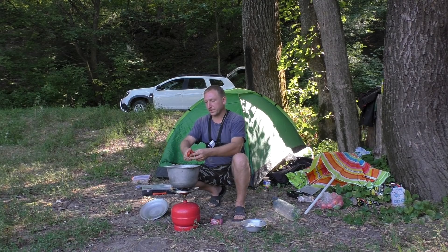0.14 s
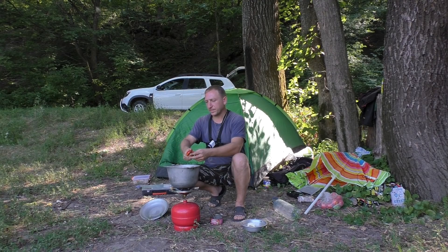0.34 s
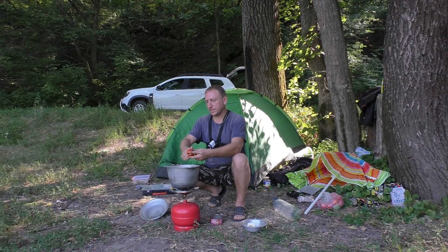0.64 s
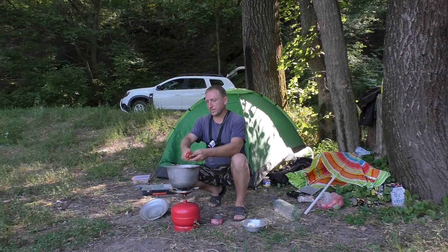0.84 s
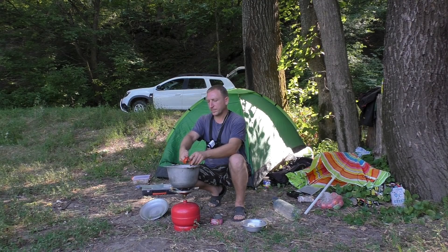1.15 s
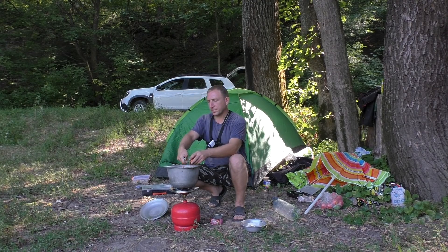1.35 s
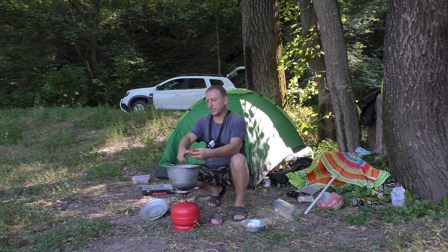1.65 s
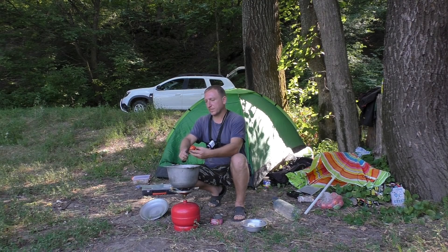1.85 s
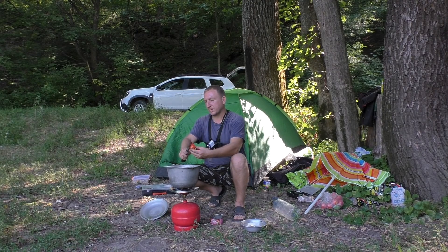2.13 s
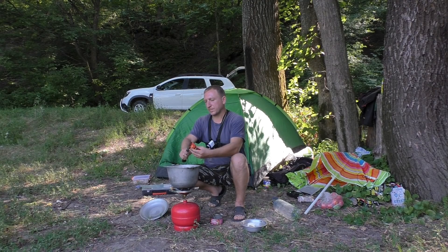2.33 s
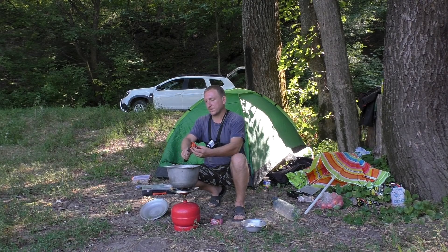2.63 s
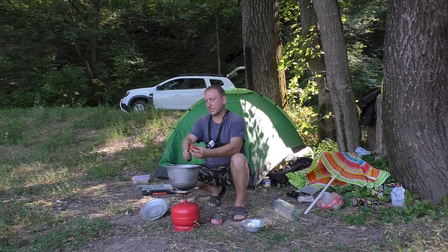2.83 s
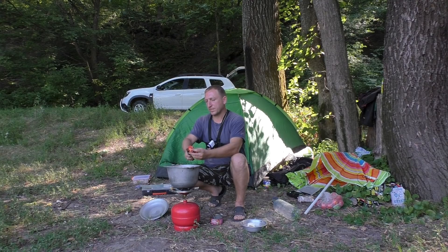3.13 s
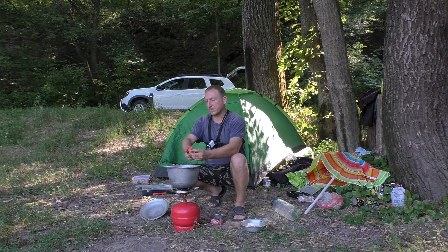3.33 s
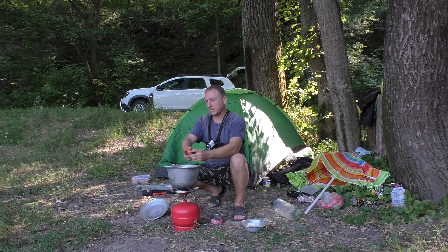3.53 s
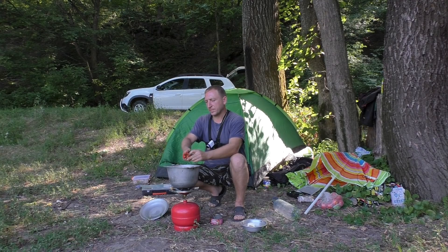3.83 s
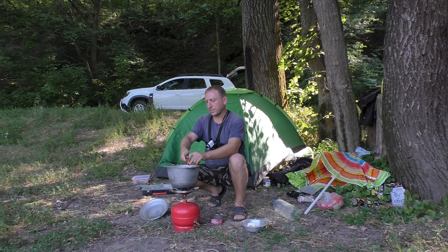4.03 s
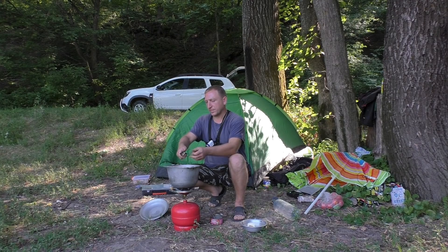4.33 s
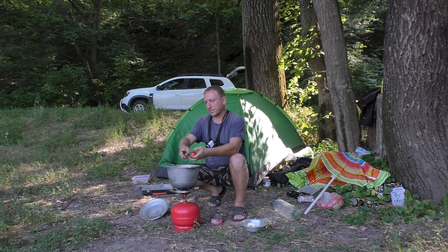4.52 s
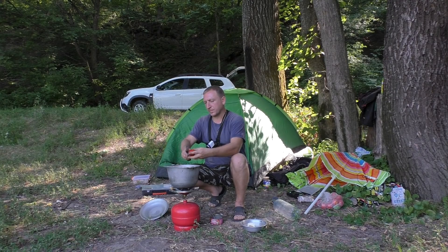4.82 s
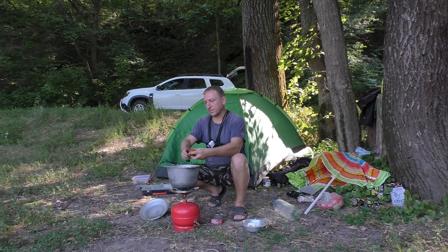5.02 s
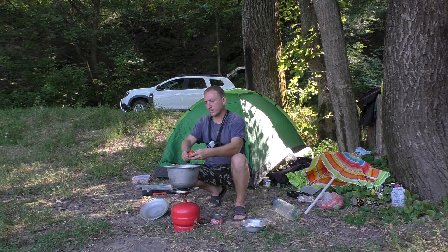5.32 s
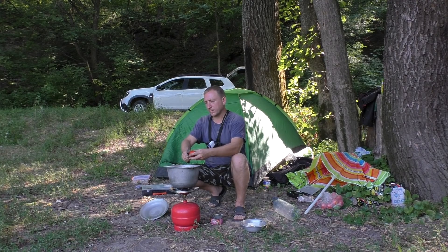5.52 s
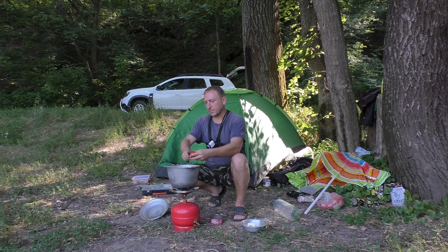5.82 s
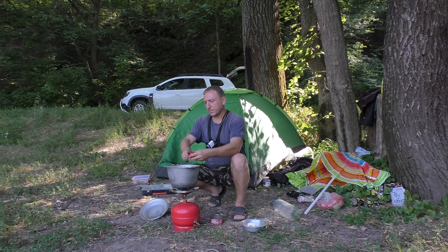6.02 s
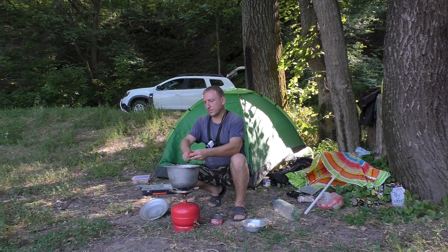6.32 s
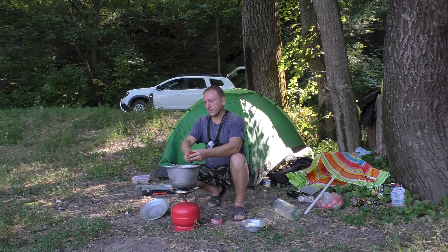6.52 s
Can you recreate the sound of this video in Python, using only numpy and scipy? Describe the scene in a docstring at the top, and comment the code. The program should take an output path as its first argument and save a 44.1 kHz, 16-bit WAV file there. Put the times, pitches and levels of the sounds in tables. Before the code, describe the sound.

Throughout about 6.7 seconds, a gas burner hisses steadily close by, over a low, fluttering flame roar. The hiss is bright and airy, with narrow high peaks that wander and swell, softening around 2.5 to 3 seconds and again near 4.9 and 6.1. Behind it lies a wide, soft rush of woods and a very faint low hum. A sharp knife tick comes at 0.95 seconds; at 1.53 to 1.6 a tight cluster of loud crunchy snaps follows, with a small low plop at 1.65. Weak bird peeps come at 1.8 and 2.2, and a barely audible lower note at 5.2. Faint skin rasps pass at 1.8 and 2.9. Around 4.2 to 4.36, light cuts, two soft plops, small pot knocks and a clearer click occur. From about 5.8, gentle rasping continues to the end, with one crisp click at 6.18. The outdoor space is dry, with only slight scattered reflections.

```python
"""A gas burner hisses and rumbles under a pot at a forest camp: a fluttering noise roar plus jet noise
with tube resonances and wandering peaks. Behind it lie the wide noise rush of the woods and a low hum.
Someone cuts vegetables over the pot: pushes and crunches ring the knife's modes, noise rasps through
skin, and pieces drop in with soft, damped tones. A faint bird sings short sine notes."""
import sys
import numpy as np
from scipy import signal
from scipy.fft import rfft, irfft, next_fast_len
from scipy.io import wavfile
from scipy.ndimage import uniform_filter1d, map_coordinates

SR = 44100
rng = np.random.default_rng(int(sys.argv[2]) if len(sys.argv) > 2 else 0)


def wav_out(sig):
    """Save sig, one row per channel (or a flat mono array), as 16-bit PCM at SR to the path in sys.argv[1]."""
    wavfile.write(sys.argv[1], SR, np.round(np.clip(np.atleast_2d(sig).T, -1, 1) * 32767).astype(np.int16))


N = 293706

# flame strength, slow changes: (time [s], level [dB])
FLAME_LEVEL = [(0, -44), (.3, -43), (.65, -46), (1.2, -43), (2.3, -43.5), (2.7, -43.5), (3.3, -43.5),
               (4.2, -43), (4.9, -45.5), (5.8, -45), (6.2, -42.5), (6.66, -45.5)]
# flame roar, relative spectrum: (frequency [Hz], density [dB per Hz])
ROAR_SPECTRUM = [(20, -22), (50, -10), (70, -9.5), (105, -3), (135, -3.5), (180, -.5), (240, 0), (300, -3),
                 (400, -10.5), (490, -14.5), (700, -16.5), (950, -31), (2000, -54)]
FLAME_SWAY_DB, FLAME_FLUTTER_DB = 0.52, 1.18

# gas flow, hiss level before trim: (time [s], level [dB])
FLOW_LEVEL = [(0.0, -49.5), (1.04, -49.5), (1.11, -48.5), (3.47, -49), (4.25, -48.5), (4.41, -49.5),
              (5.58, -50), (6.25, -47.5), (6.66, -49)]
# jet hiss, relative spectrum: (frequency [Hz], density [dB per Hz])
JET_SPECTRUM = [(300, -40), (1000, -33), (2000, -29), (2900, -12.5), (3400, -0.5), (4500, -3.5),
                (5500, -4.5), (6600, -2.5), (7700, -6.5), (8700, -14), (9300, -17.5), (10200, -15),
                (13200, -21.5), (16000, -23)]
# mixing tube and gap under the pot, before widening: (frequency [Hz], width [Hz], gain [dB])
TUBE_MODES = [(571.4, 72, 7.5), (1192, 60, -4.5), (1557, 106, 4.5), (2165, 220, -3.5), (3880, 210, -1),
              (4357, 150, 2), (5280, 220, -2), (5600, 180, 0.5)]
# main hiss peak, before swing and trim; its swell also leads the sizzle: (time [s], level [dB])
MAIN_PEAK_LEVEL = [(0.0, -55.5), (0.65, -53), (1.93, -52.5), (2.5, -60.5), (3.04, -58), (3.41, -54),
                   (3.65, -53), (4.51, -54), (4.92, -58), (5.57, -53.5), (5.69, -52), (6.12, -57),
                   (6.38, -52.5), (6.66, -53)]
# main hiss peak, slow drift: (time [s], centre [Hz])
MAIN_PEAK_CENTRE = [(0, 7000), (.7, 7300), (1.9, 7326), (2.6, 6840), (3.4, 7095), (4.6, 7200), (5.1, 6820),
                    (6.66, 6960)]
# weaker hiss peak above it, before swing and trim: (time [s], level [dB])
UPPER_PEAK_LEVEL = [(0.0, -61), (0.52, -64), (0.76, -60), (1.15, -64.5), (2.21, -61.5), (2.97, -66),
                    (5.01, -59.5), (5.34, -64), (5.57, -64), (5.73, -60), (6.08, -63), (6.66, -59)]
UPPER_PEAK_HZ, UPPER_DRIFT_SHARE = 8410, 0.33  # share of the main peak's drift
SIZZLE_DB, SIZZLE_DB_PER_DB = -63.5, 1.15  # level before trim; growth with the main peak
# likeness of the hiss at the two microphones, clipped to +-1: (frequency [Hz], likeness [1])
JET_LIKENESS = [(1500, 0.6), (3600, 1.4), (5500, 4.5), (6500, .8), (8400, 0.9), (9600, 1.6), (11000, 1),
                (14000, 2.5)]
# left-right balance of the hiss: (frequency [Hz], L-R [dB])
JET_BALANCE = [(2000, -2.5), (5500, 0), (7200, -1), (11000, -2)]

# far rush of the woods, relative spectrum: (frequency [Hz], density [dB per Hz])
WOODS_SPECTRUM = [(20, -35), (50, -12), (120, -2), (300, 0), (550, 1.5), (1000, -3.5), (1450, -4),
                  (2000, -4.5), (3000, -12.5), (5000, -12.5), (15000, -31)]
HUM_HZ, HUM_DB = 37.2, -59  # centres of a slow random wander

# knife contacts: (time [s], level [dB], centre [Hz], spread [octaves], crunch decay by 20 dB [s])
KNIFE_CLICKS = [(0.9457, -22, 5400, 0.84, 0.00027), (1.5345, -33, 11000, 1.6, .0015),
                (1.5503, -28, 4800, 0.67, .002), (1.554, -18, 4930, .3, .0016),
                (1.5541, -16, 2100, 0.43, 0.0017), (1.5552, -19, 2980, 0.31, 0.003),
                (1.5582, -13.5, 5170, .25, 0.0026), (1.563, -26, 6300, 0.41, 0.0034),
                (1.566, -23, 2190, 0.54, 0.0088), (1.567, -22.5, 3620, 0.095, 0.0027),
                (1.5984, -22, 4840, 1.17, 0.0036), (4.206, -36, 2200, 1, .005),
                (4.2665, -37, 6500, 0.76, .003), (4.3595, -18, 6600, 0.68, 0.0024),
                (6.1838, -16.5, 3580, 0.23, 0.00064)]
# knife modes: (frequency [Hz], width [Hz], gain [dB])
KNIFE_MODES = [(1250, 290, 3), (1960, 160, 8.5), (2430, 320, 1), (2880, 88, 4.5), (3620, 300, 5),
               (4100, 180, -2.5), (4930, 420, -0.5), (5770, 330, 7), (6040, 640, 2.5), (7050, 660, 2)]
# bright snap of a contact: (frequency [Hz], width [Hz], gain [dB])
SNAP_MODES = [(9300, 1400, -5), (10100, 710, -4), (13100, 2500, -1), (15500, 1200, -12)]
EQUAL_CRUNCH_S = 0.0018  # a crunch of this length is as strong as its push; longer ones are stronger
KNIFE_BALANCE_DB = -1.5  # L-R

# pieces landing softly in the pot: (time [s], level [dB], pitch [Hz])
PLOP_EVENTS = [(1.536, -34, 845), (1.655, -27, 218), (4.2252, -24, 478), (4.249, -31, 520)]
PLOP_T60_CYCLES = 11
# light knocks on the pot: (time [s], level [dB])
POT_KNOCKS = [(4.2966, -27.5), (4.309, -30), (4.3576, -27)]
# damped pot modes, mean gains: (frequency [Hz], gain [dB], t60 [s])
POT_MODES = [(1240, -3.5, 0.015), (1670, -3, 0.013), (2100, 2, 0.014)]

# far bird: (start [s], length [s], start pitch [Hz], end pitch [Hz], level [dB])
BIRD_NOTES = [(1.812, 0.11, 4570, 4570, -50), (2.165, 0.025, 3690, 4100, -42),
              (5.24, .3, 1160, 1240, -58.5)]

# blade strokes through skin: (middle [s], length [s], peak level [dB])
RASP_STROKES = [(1.834, 0.013, -45.5), (2.91, 0.12, -52), (4.2, 0.14, -52), (4.29, .04, -47),
                (5.248, .074, -55), (6.041, 0.49, -54), (6.253, 0.053, -46), (6.353, 0.16, -46.5),
                (6.482, .2, -52)]
# rasp, relative spectrum: (frequency [Hz], density [dB per Hz])
SKIN_SPECTRUM = [(700, -27), (1400, 8.5), (2900, 1.5), (4200, 6.5), (9000, -38)]

BAND_LIMIT_HZ = 15800


def amp(db):
    """Decibels to gain."""
    return 10 ** (np.asarray(db) / 20)


def unit(x):
    """x at rms 1."""
    return x / np.sqrt(np.mean(x ** 2) + 1e-20)


def burst(x):
    """x with the energy of one millisecond at rms 1."""
    return x * np.sqrt(SR / 1000 / (np.sum(x ** 2) + 1e-20))


def along(points, hz):
    """(Hz, value) points read on a log axis."""
    f, v = np.transpose(points)
    return np.interp(np.log(hz + 1), np.log(f + 1), v)


def curve(points):
    """(s, value) points read at every sample."""
    s, v = np.transpose(points)
    return np.interp(np.arange(N) / SR, s, v)


def wobble(rate):
    """A smooth random curve, rate knots a second."""
    knots = rng.standard_normal(int(N * rate / SR) + 4)
    return map_coordinates(knots, [np.arange(N) * rate / SR])


def filtered(x, response):
    """x times a response of frequency."""
    n = x.shape[-1]
    m = next_fast_len(n + 8192)
    return irfft(rfft(x, m) * response(np.fft.rfftfreq(m, 1 / SR)), m)[..., :n]


def noise(spectrum, channels=1):
    """Coloured noise of rms 1."""
    return unit(filtered(rng.standard_normal((channels, N)), lambda hz: amp(along(spectrum, hz))))


def resonance(hz, centre, width):
    """Causal response of one mode."""
    return 1j * hz * width / (centre ** 2 - hz ** 2 + 1j * hz * width)


def add(track, s, sound):
    """Mix a sound into the track at time s."""
    part = track[round(s * SR):][:len(sound)]
    part += sound[:len(part)]


def flame():
    """Turbulent burning: a low, fluttering roar."""
    level_db = curve(FLAME_LEVEL)
    level_db += FLAME_SWAY_DB * wobble(7) + FLAME_FLUTTER_DB * wobble(16)
    return amp(level_db) * noise(ROAR_SPECTRUM)


def hiss_peak(centre_hz, width_hz):
    """Two narrow noises of rms 1: slow noise modulates a carrier that follows a moving centre."""
    slow = filtered(rng.standard_normal((2, 2, N)), lambda hz: np.exp(-(hz / width_hz) ** 2))
    phase = 2 * np.pi * np.cumsum(centre_hz) / SR
    return unit(slow[0] * np.cos(phase) + slow[1] * np.sin(phase))


def patchy(x, depth_db):
    """Let each narrow band of x swell and sink slowly on its own."""
    bands = signal.stft(x, nperseg=512)[2]
    field = uniform_filter1d(rng.standard_normal(bands.shape[1:]), size=5, axis=0)
    field = uniform_filter1d(field, size=50, axis=1)
    field = uniform_filter1d(field, size=30, axis=1)
    return signal.istft(bands * amp(depth_db * unit(field)), nperseg=512)[1][:, :N]


def tube_response(hz, widening=1.38):
    """Jet spectrum plus, in power, the resonances of the tube and the gap."""
    power = amp(along(JET_SPECTRUM, hz)) ** 2
    for centre_hz, width_hz, db in TUBE_MODES:
        power = power + abs(amp(db) * resonance(hz, centre_hz, widening * width_hz) ** 2) ** 2
    return np.sqrt(power)


def two_microphones(pair):
    """Mix two independent noises to a set likeness and balance at the two microphones."""
    def split(hz):
        turn = np.arccos(np.clip(along(JET_LIKENESS, hz), -1, 1)) / 2
        return np.array([np.cos(turn), np.sin(turn)])

    # side: the share heard differently at the two
    mid, side = filtered(pair, split)
    balance = lambda hz: amp(np.outer([.5, -.5], along(JET_BALANCE, hz)))
    return filtered(np.array([mid + side, mid - side]), balance)


def jet(hiss_db=2, lower_db=0, upper_db=-2, top_db=-1.5, halo_db=-4, sizzle_hz=10930,
        halo_hz=11700, lower_swing=1.3, upper_swing=1.8, waver_db=1.9):
    """Gas hisses through the mixing tube; its sharpest peaks wander and swell."""
    main_db, second_db = curve(MAIN_PEAK_LEVEL), curve(UPPER_PEAK_LEVEL)
    swell_db = main_db - main_db.mean()
    second_swell_db = second_db - second_db.mean()
    low_db = main_db.mean() + lower_swing * swell_db + waver_db * wobble(7)
    high_db = second_db.mean() + upper_swing * second_swell_db + waver_db * wobble(7)
    low_hz = curve(MAIN_PEAK_CENTRE)
    high_hz = UPPER_PEAK_HZ + UPPER_DRIFT_SHARE * (low_hz - low_hz.mean()) + 70 * wobble(3)
    sizzle_db = SIZZLE_DB + SIZZLE_DB_PER_DB * swell_db + 1.5 * wobble(3)

    hiss = unit(filtered(rng.standard_normal((2, N)), tube_response))
    pair = amp(curve(FLOW_LEVEL) + hiss_db) * hiss
    pair += amp(low_db + lower_db) * hiss_peak(low_hz, width_hz=480)
    pair += amp(high_db + upper_db) * hiss_peak(high_hz, width_hz=240)
    # top sizzle: narrow peak and wide skirt above it, swelling together
    pair += amp(sizzle_db + top_db) * hiss_peak(sizzle_hz + 60 * wobble(2.2), width_hz=290)
    pair += amp(sizzle_db + halo_db) * hiss_peak(halo_hz + 120 * wobble(1.8), width_hz=1400)
    return two_microphones(patchy(pair, depth_db=1.25))


def woods(rush_db=-50.0, sway_db=1.17):
    """A diffuse rush from all round, with a faint low hum in it."""
    phase = 2 * np.pi * HUM_HZ * np.arange(N) / SR + 0.47 * wobble(3.14)
    hum = amp(HUM_DB + wobble(2.34)) * unit(np.sin(phase))
    rush = amp(rush_db + sway_db * wobble(1.4)) * noise(WOODS_SPECTRUM, channels=2)
    return rush + hum


def modes_response(hz, modes, order=1, weight=lambda centre_hz: 1):
    """Sum of weighted modes with alternating signs."""
    return sum((-1) ** k * amp(db) * weight(centre_hz) * resonance(hz, centre_hz, width_hz) ** order
               for k, (centre_hz, width_hz, db) in enumerate(modes))


def knife(crack_db=-5, snap_db=-3, snap_hz=11000):
    """A sharp push and short crunch; the contact's centre picks which modes ring and how much it snaps."""
    track, t = np.zeros(N), np.arange(SR // 10) / SR
    impulse = 1. * (t == 0)
    for s, db, contact_hz, spread, crunch_s in KNIFE_CLICKS:
        grit = rng.standard_normal(len(t)) * np.sqrt(t) * amp(-20 * t / crunch_s)
        push = burst(impulse) + crunch_s / EQUAL_CRUNCH_S * burst(grit)
        reach = lambda hz: 1 / (1 + abs(np.log2(hz / contact_hz) / spread) ** 2.5)
        ring = filtered(push, lambda hz: modes_response(hz, KNIFE_MODES, weight=reach))
        # the contact itself, without the ring
        crack_width_hz = 0.82 * spread * contact_hz
        crack = filtered(impulse, lambda hz: resonance(hz, contact_hz, crack_width_hz) ** 3)
        snap = filtered(push, lambda hz: modes_response(hz, SNAP_MODES, order=2))
        body = burst(burst(ring) + amp(crack_db) * burst(crack))
        bright = amp(snap_db) * reach(snap_hz) ** 1.16 * burst(snap)
        add(track, s, amp(db) * (body + bright))
    return np.outer(amp([KNIFE_BALANCE_DB / 2, -KNIFE_BALANCE_DB / 2]), track)


def plops(attack_s=0.00087):
    """Soft pieces land in the pot, each with one short, damped note; light knocks ring the pot's modes."""
    track, t = np.zeros(N), np.arange(SR // 10) / SR

    def note(hz, t60_s):
        """Damped sine with a soft onset."""
        return np.sin(2 * np.pi * hz * t) * amp(-60 * t / t60_s) * (1 - np.exp(-t / attack_s))

    for s, db, hz in PLOP_EVENTS:
        add(track, s, amp(db) * burst(note(hz, PLOP_T60_CYCLES / hz)))
    for s, db in POT_KNOCKS:
        # each knock rings the modes in a slightly different mix
        ring = sum(amp(g + 2 * rng.standard_normal()) * note(hz, t60_s) for hz, g, t60_s in POT_MODES)
        add(track, s, amp(db) * burst(ring))
    return track


def bird():
    """Thin steady or gliding sine notes from the trees."""
    track = np.zeros(N)
    for s, length_s, start_hz, end_hz, db in BIRD_NOTES:
        pitch_hz = np.linspace(start_hz, end_hz, int(length_s * SR))
        tone = np.sin(2 * np.pi * np.cumsum(pitch_hz) / SR)
        add(track, s, amp(db) * np.hanning(len(tone)) * tone)
    return track


def rasp(grain_db=3.0):
    """The blade drags through skin in small uneven tears."""
    pressure = np.zeros(N)
    for middle_s, length_s, db in RASP_STROKES:
        add(pressure, middle_s - length_s / 2, amp(db) * np.hanning(int(length_s * SR)))
    return pressure * unit(noise(SKIN_SPECTRUM)[0] * amp(grain_db * wobble(120)))


def clearing(x, wet_db, t60_s):
    """Surfaces round about scatter a faint, decaying noise tail to each side."""
    t = np.arange(SR // 2) / SR
    tail = rng.standard_normal((2, len(t))) * amp(-60 * t / t60_s)
    tail /= np.linalg.norm(tail[0])
    return x + amp(wet_db) * signal.fftconvolve(np.atleast_2d(x), tail, axes=1)[:, :N]


def scene():
    """Burner and cook sit near the middle, the woods all round."""
    # short tail: pot and knees; longer tail: ground, tent and trunks
    near = clearing(knife() + plops() + rasp(), wet_db=-13, t60_s=.009)
    cooking = clearing(near, wet_db=-19, t60_s=.11)
    far_bird = clearing(bird(), wet_db=-10, t60_s=.4)
    return flame() + jet() + woods() + cooking + far_bird


def record(dry):
    """The microphones' chain keeps nothing above its band limit."""
    return filtered(dry, lambda hz: hz < BAND_LIMIT_HZ)


dry = scene()
out = record(dry)
wav_out(out)
```